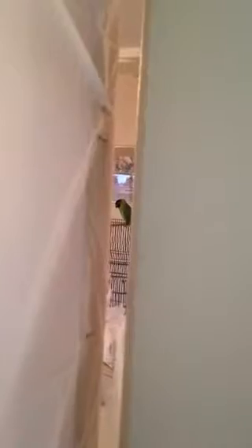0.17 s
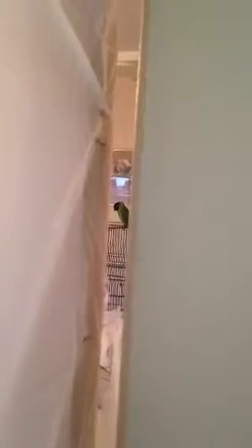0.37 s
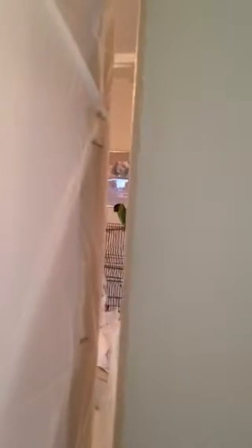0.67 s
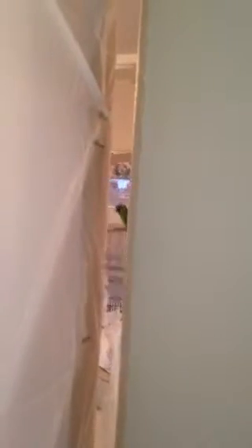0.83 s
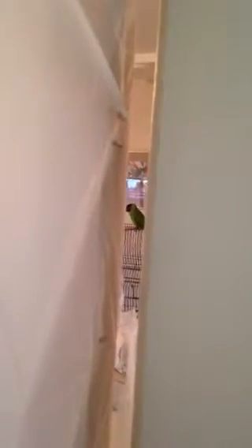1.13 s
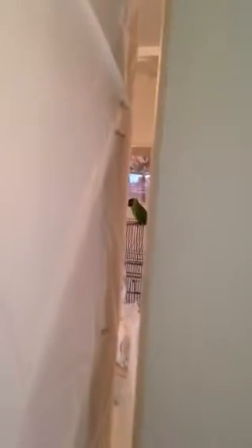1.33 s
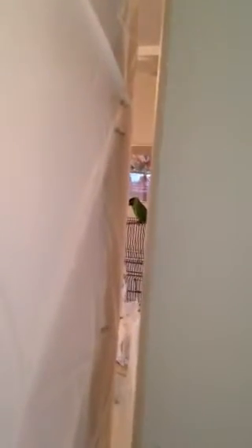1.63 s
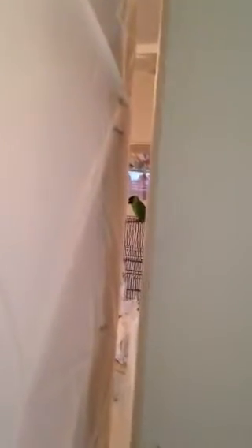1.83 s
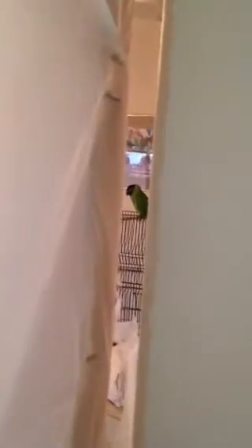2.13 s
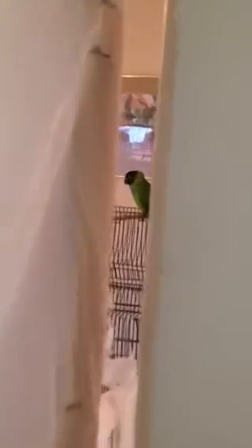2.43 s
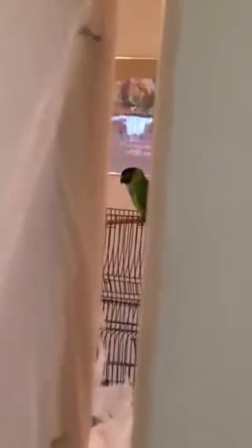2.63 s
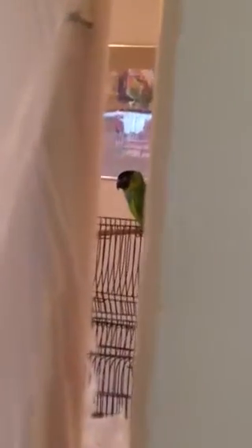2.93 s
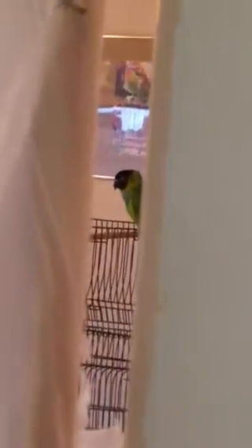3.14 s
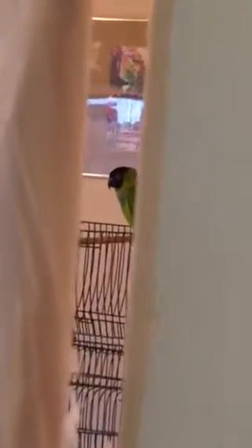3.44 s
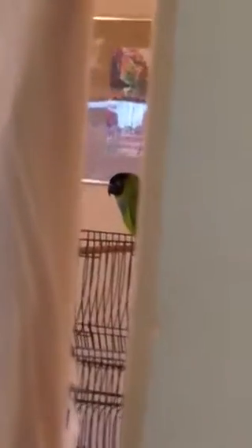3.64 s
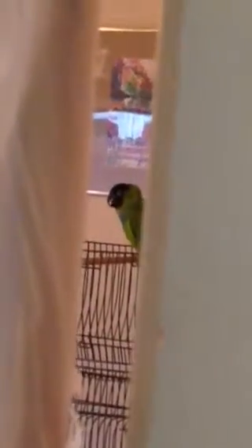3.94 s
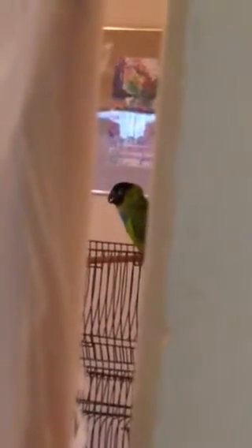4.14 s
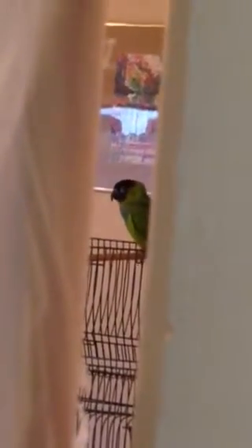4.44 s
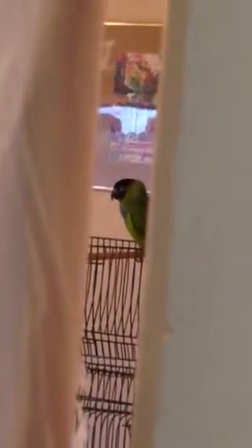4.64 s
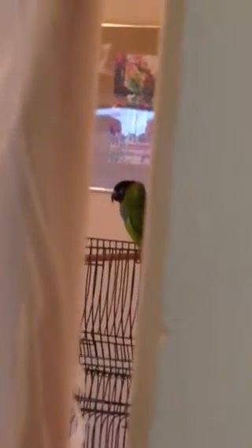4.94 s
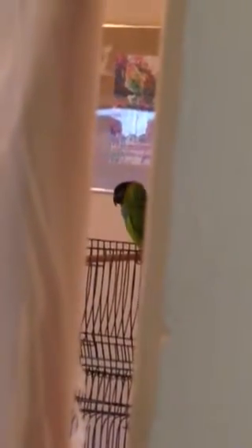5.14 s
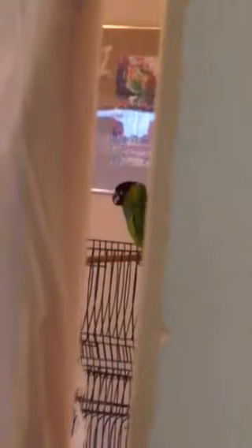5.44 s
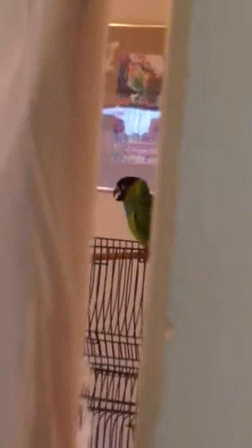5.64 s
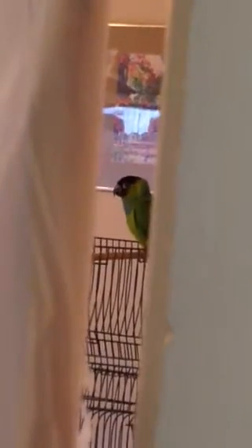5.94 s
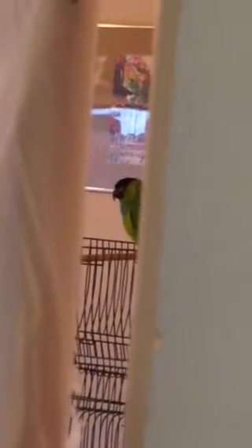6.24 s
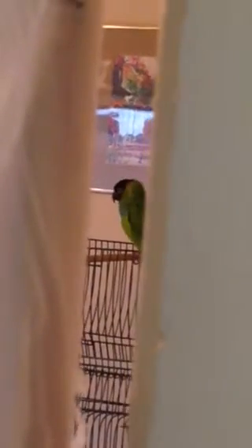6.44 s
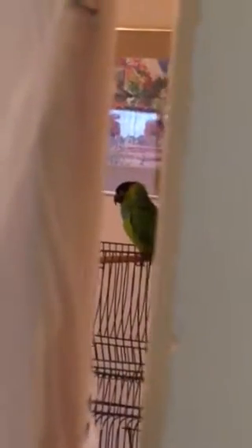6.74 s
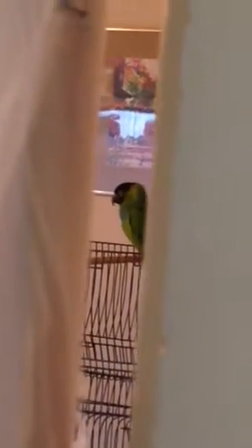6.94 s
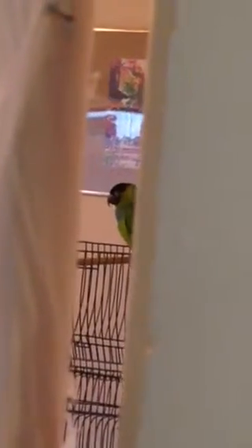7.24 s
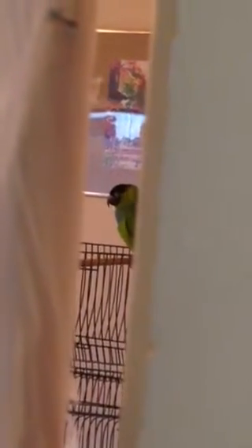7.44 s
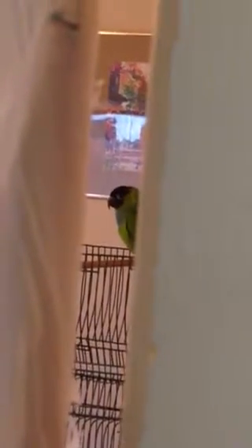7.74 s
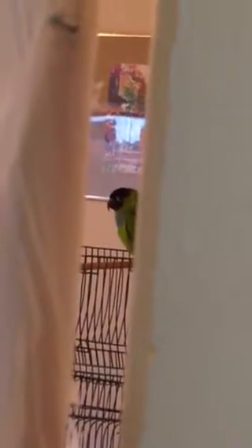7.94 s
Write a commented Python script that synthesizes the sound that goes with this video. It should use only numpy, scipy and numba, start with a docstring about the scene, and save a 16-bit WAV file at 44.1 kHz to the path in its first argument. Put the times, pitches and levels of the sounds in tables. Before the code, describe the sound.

Indoors over a steady low hum, a parrot's soft croaks and whistles build to four quick, harsh squawks and a last peep.

```python
"""A conure on its cage in a small, live room, over steady mains hum. A curtain rustles, then the bird's
syrinx membranes give two soft croaks and a whistle. A hand brushes and knocks the phone as the curtain
slips on. A croak leads into a harsh, fluttering rasp, another into a cracking whistle; four screeching
squawks follow, and the phone's gain control ducks the hum under them. A last peep rings off the walls,
and a few close ticks and a dull brush end the scene."""
import sys
import numpy as np
from scipy import signal
from scipy.fft import rfft, irfft, next_fast_len
from scipy.io import wavfile
from scipy.ndimage import minimum_filter1d
from numba import njit

SR = 44100
rng = np.random.default_rng(int(sys.argv[2]) if len(sys.argv) > 2 else 0)


def output_pcm(signal):
    """Save a mono or channel-first signal as 16-bit PCM at the path in sys.argv[1].

    Samples are clipped to [-1, 1] before scaling.
    """
    pcm = np.clip(np.atleast_2d(signal).T, -1, 1) * 32767
    wavfile.write(sys.argv[1], SR, np.round(pcm).astype(np.int16))


N = 356857
T = np.arange(N) / SR
CALL = SR // 4  # samples, more than the longest call
ONSET_DB = -19.5  # every call swells from this far down
COLLAPSE_S, FRAY_S = 0.0072, 0.012  # as the pressure fails, the pitch drops and the tone frays


def syrinx(hz, db, rough, lift_db, throat, halves_db, jitter, flutter_hz, patchy_db, air_db, tilt_db=0):
    """One call. The membranes beat at the pitch; driven hard they flutter and alternate strong and weak
    beats, which adds lines halfway between the harmonics. lift_db raises the second harmonic;
    a wider beak brightens the call by tilt_db an octave."""
    t = T[:len(hz)]
    flutter = jitter * rough * wobble(flutter_hz, CALL)[:len(t)]
    phase = 2 * np.pi * np.cumsum(hz * (1 + flutter)) / SR
    k = np.arange(1, 33)[:, None] / 2  # harmonics and the halves between them
    # the shape of the beat keeps changing, so each partial swells and fades on its own
    patches = wobble(80, len(k) * CALL).reshape(len(k), CALL)[:, :len(t)]
    colour_db = lookup(throat, k * hz) + tilt_db * np.log2(k)
    gain = undb(colour_db + halves_db * (k % 1 > 0) + lift_db * (k == 2) + patchy_db * patches)
    gain *= np.clip((SR / 2 - k * hz) / (SR / 10), 0, 1)  # the highest partials fade out smoothly
    gain /= np.sqrt(np.sum(gain ** 2, axis=0) / 2)
    tone = np.sum(gain * np.sin(k * phase + rng.uniform(0, 2 * np.pi, k.shape)), axis=0)
    # turbulent air escapes once a beat
    air = undb(air_db) * rough * noise(throat, CALL)[:len(t)] * (1 + .5 * np.cos(phase))
    fade = np.clip(np.minimum(t, t[-1] - t) / 0.0026, 0, 1)
    return (tone + air) * fade * undb(db)


def arch(t, crest_hz, crest_s, scoop_hz, sag_hz, sag_s, drop_hz):
    """Pitch of a call: it scoops up to a crest, sags to a lower note and drops at the very end."""
    scoop = np.maximum(1 - t / crest_s, 0) ** 2
    sag = 1 - np.exp(-(np.maximum(t - crest_s, 0) / sag_s) ** 2)
    drop = np.exp((t - t[-1]) / COLLAPSE_S)
    return crest_hz - scoop_hz * scoop - sag_hz * sag - drop_hz * drop


def effort(t, attack_s, fade_db):
    """Level of a call in dB: a quick swell, then an even fade (a rise if fade_db is negative)."""
    return ONSET_DB * np.exp(-t / attack_s) - fade_db * t / t[-1]


# The four squawks. Each row: start, sweep length and screech length in seconds, gain in dB,
# brightness of the screech in dB an octave.
SQUAWKS = [(5.099, 0.024, 0.1, -1, 0), (5.312, 0.023, 0.098, 1.5, 0), (5.53, .027, .102, 3, 0),
           (5.765, 0.026, 0.099, 4.5, -0.5)]


def squawks(overlap_s=.003):
    """Each harsh upward sweep breaks into a screech while it still sounds."""
    out = np.zeros(N)
    for start, sweep_s, screech_s, db, tilt_db in SQUAWKS:
        add(out, start, undb(db) * sweep(clock(sweep_s + overlap_s)))
        add(out, start + sweep_s, undb(db) * screech(clock(screech_s), tilt_db))
    return out


# Throat and beak colour of the screech. Each row: frequency in Hz, gain in dB.
SCREECH_THROAT = [(150, -31.5), (400, -10), (1000, -17), (1600, -23.5), (2050, -5), (2500, -15), (3050, 6),
                  (3550, 0), (4150, 2), (4550, -8.5), (5100, 2), (6100, 1), (6600, -12.5), (7100, 5.5),
                  (8100, -11), (8650, -14.5), (9300, 2), (10200, -10.5), (11000, -5), (12200, -25),
                  (15000, -22.5)]
# Flicks that lift the pitch and the second harmonic. Each entry: seconds into the screech.
FLICKS_S = [0.047, .067]


def screech(t, tilt_db):
    """The loud, brassy body of a squawk: a period-doubled arch with two upward flicks and a frayed end."""
    flick = sum(bump(t, at, width=.008) for at in FLICKS_S)
    hz = arch(t, crest_hz=2024.5, crest_s=0.027, scoop_hz=79.7, sag_hz=16, sag_s=.06, drop_hz=311)
    hz += 88.7 * flick
    hz *= 1 + .008 * wobble(70, CALL)[:len(t)]  # the pitch never holds quite still
    db = -2.5 + effort(t, attack_s=.001, fade_db=-0.96)
    rough = 0.16 + 0.44 * np.exp((t - t[-1]) / FRAY_S)
    halves_db = -10 + ONSET_DB * np.exp(-t / 0.0024)  # the doubling sets in after the first moments
    return syrinx(hz, db, rough, lift_db=4.5 + 4.5 * flick, throat=SCREECH_THROAT, halves_db=halves_db,
                  jitter=.042, flutter_hz=700, patchy_db=3, air_db=-7, tilt_db=tilt_db)


# Throat and beak colour of the sweep. Each row: frequency in Hz, gain in dB.
SWEEP_THROAT = [(350, -42.5), (650, -8), (1300, -6), (1900, -19), (2900, 8), (3900, 4), (5000, -4.5),
                (7000, -7.5), (10000, -13.5), (12000, -29), (15000, -32.5)]


def sweep(t, from_hz=610, to_hz=1533.6):
    """The rough rise that opens a squawk."""
    hz = np.linspace(from_hz, to_hz, len(t))
    db = -8.5 + effort(t, attack_s=.003, fade_db=2.5)
    return syrinx(hz, db, rough=0.35, lift_db=0, throat=SWEEP_THROAT, halves_db=-10.5,
                  jitter=0.096, flutter_hz=593, patchy_db=1.5, air_db=-19.0)


# Two whistles and the last peep. Each row: start, length and attack in seconds, level and fade in dB,
# crest in Hz, seconds to the crest, scoop and sag in Hz, sag time in seconds, closing drop in Hz,
# second-harmonic lift at the start and at the end in dB, brightness in dB an octave.
WHISTLES = [ (1.646, 0.1, 0.0012, -20.5, 4.5, 2513, 0.018, 30, 156, 0.04, 140, 29.5, -2.5, -1.5),
            (4.91, .118, 0.0042, -15.5, 12.5, 2675, 0.021, 142, 210, 0.024, 700, 1, 4.5, 3),
            (6.121, .08, 0.01, -17, 5, 2473, 0.035, 153, 12, 0.032, 23, 6.5, 6.5, 2)]
# Throat and beak colour of a whistle. Each row: frequency in Hz, gain in dB.
WHISTLE_THROAT = [(1200, -7.5), (2400, -1.5), (5000, -16), (7500, -17.5), (10000, -30), (12500, -30),
                  (15000, -27.5)]


def whistles(crack_at_s=4.973):
    """Clean arched notes that fray and dull as they end; the second one cracks halfway through."""
    out = np.zeros(N)
    for start, length, attack_s, db, fade_db, *pitch, first_db, last_db, tilt_db in WHISTLES:
        t = clock(length)
        ending = np.exp((t - t[-1]) / FRAY_S)
        rough = 0.056 + 0.092 * ending + 0.53 * bump(start + t, crack_at_s, width=.008)
        level_db = db + effort(t, attack_s, fade_db)
        lift_db = np.linspace(first_db, last_db, len(t))
        note = syrinx(arch(t, *pitch), level_db, rough, lift_db, WHISTLE_THROAT, halves_db=-56.5,
                      jitter=.04, flutter_hz=700, patchy_db=3.5, air_db=-39.5,
                      tilt_db=tilt_db - 5 * ending)
        add(out, start, note)
    return out


# Throat and beak colour of the rasp. Each row: frequency in Hz, gain in dB.
RASP_THROAT = [(500, -37.5), (1100, -25.5), (1600, -27.5), (2250, -1.5), (2800, -9.5), (3300, -3),
               (3750, -5.5), (4200, 2), (4700, 0.5), (5100, -13), (5600, -5), (6600, -10), (8000, -12.5),
               (10000, -28), (15000, -39)]


def rasp(start_s=4.026, length_s=.168):
    """One long, rough arch: the membranes flutter chaotically and smear every harmonic into a band."""
    out, t = np.zeros(N), clock(length_s)
    hz = arch(t, crest_hz=2253, crest_s=.115, scoop_hz=223.3, sag_hz=88.7, sag_s=0.033, drop_hz=291.4)
    db = -15 + effort(t, attack_s=0.012, fade_db=-1.0)
    call = syrinx(hz, db, rough=0.74, lift_db=2, throat=RASP_THROAT, halves_db=-2.0,
                  jitter=.055, flutter_hz=220, patchy_db=2.5, air_db=-36.5)
    add(out, start_s, call)
    return out


# The croaks. Each row: start and length in seconds, first and last pitch in Hz, level in dB,
# roughness from 0 to 1, second-harmonic lift in dB.
CROAKS = [(1.422, 0.018, 574, 923, -33, 0.84, 4.5), (1.611, 0.029, 585, 1157, -35, 0.83, 4),
          (4.022, 0.024, 1054, 1580, -41, 0.6, 10.5), (4.874, 0.032, 517, 1145, -28.5, 0.15, 0)]
# Throat and beak colour of a croak. Each row: frequency in Hz, gain in dB.
CROAK_THROAT = [(330, -26), (600, -2.5), (950, 11), (1450, 0.5), (2000, -0.5), (3000, -11.5), (4000, -12),
                (5500, -14.5), (7000, -28.5), (9000, -38.5), (15000, -50.5)]


def croaks():
    """Soft, low glides that swell as they rise."""
    out = np.zeros(N)
    for start, length, first_hz, last_hz, db, rough, lift_db in CROAKS:
        t = clock(length)
        hz = np.linspace(first_hz, last_hz, len(t))
        level_db = db + effort(t, attack_s=0.0021, fade_db=0)
        croak = syrinx(hz, level_db, rough, lift_db, CROAK_THROAT, halves_db=-24,
                       jitter=0.073, flutter_hz=598.7, patchy_db=2.0, air_db=-18.5)
        add(out, start, croak)
    return out


# Small knocks and ticks of handling. Each row: start in seconds, level in dB, resonance in Hz.
KNOCKS = [(1.064, -39, 338), (1.864, -30.5, 557), (2.082, -44.5, 4400), (2.303, -54, 7790),
          (7.146, -44, 2300), (7.319, -56, 1626), (7.414, -46.5, 2784), (7.435, -36, 1580)]


def knocks():
    """Dead little blows, each with one broad resonance; the higher the knock, the sooner it dies."""
    out, t = np.zeros(N), T[:SR // 5]
    for start, db, hz in KNOCKS:
        resonance = [(hz / 12, -18), (hz / 3, -2), (hz, 0), (hz * 3, -16), (hz * 9, -42), (hz * 20, -60)]
        contact = 1 - np.exp(-(t * hz) ** 2)  # a duller blow pushes more slowly
        decay_s = 0.00607 * (1000 / hz) ** 0.42
        add(out, start, undb(db) * noise(resonance, len(t)) * contact * np.exp(-t / decay_s))
    return out


# Slides of the curtain. Each row: peak time and half-width in seconds, level in dB.
RUSTLES = [(.198, 0.043, -48.5), (.24, 0.11, -56.5), (.03, 0.096, -66), (.58, .12, -66.5),
           (1.01, .064, -68.5), (2.05, 0.064, -64.5)]
# The bright hiss of cloth. Each row: frequency in Hz, gain in dB.
CLOTH_COLOUR = [(470, -39), (800, -1), (1330, -4.5), (2410, 7.5), (2940, 3), (3330, 8.5), (7930, 9),
                (15500, -4)]


def curtain(slip_from_s=2.16, slip_to_s=3.12):
    """Fibres catch and slip in soft strokes, then keep slipping in random swishes that die away."""
    along = (T - slip_from_s) / (slip_to_s - slip_from_s)
    slip_db = -72 - 8.5 * along + 4.5 * wobble(16, N)
    slipping = ((along > 0) & (along < 1)) * undb(slip_db)
    return (swishes(RUSTLES) + slipping) * noise(CLOTH_COLOUR, N) * undb(1.7 * wobble(80, N))


# Brushes of a hand, and the dull low thud that follows the knock at 1.864 s. Each row: peak time and half-width
# in seconds, level in dB.
BRUSHES = [(1.89, .028, -52.5), (2.62, .2, -61.5), (3.65, .06, -61), (7.8, .09, -61)]
# The muffled rub of skin. Each row: frequency in Hz, gain in dB.
SKIN_COLOUR = [(60, -5), (250, 0.5), (700, -5.5), (1500, -12), (4000, -23.5), (15000, -38)]


def hand():
    """Skin rubs dully on the phone; one soft low thud follows a knock."""
    return swishes(BRUSHES) * noise(SKIN_COLOUR, N)


# How long the room rings. Each row: frequency in Hz, seconds to fall by 60 dB.
ROOM_T60 = [(200, .3), (900, 0.52), (2200, 0.49), (4500, 0.46), (8000, 0.38), (15000, 0.11)]


def room(x, wet_db, early_db, early_s, gap_s):
    """What the walls return: a quick scatter, and a tail that lasts longest in the mids."""
    t = T[:SR]
    f = np.fft.rfftfreq(SR, 1 / SR)
    white = rfft(rng.standard_normal(SR))
    centres, t60s = np.transpose(ROOM_T60)
    tail = 0
    for share, t60 in zip(np.eye(len(centres)), t60s):
        band = irfft(white * lookup(np.c_[centres, share], f), SR)
        tail = tail + band * np.exp(-np.log(1000) * t / t60)
    # furnishings soak up the top of the scatter
    early = noise([(4000, -0.5), (8000, -4.5), (15000, -6.5)], SR) * np.exp(-t / early_s)
    response = (undb(wet_db) * tail + undb(early_db) * early) * np.clip(t / gap_s, 0, 1) / np.sqrt(SR)
    return signal.fftconvolve(x, response)[:N]


# Dark room tone. Each row: frequency in Hz, gain in dB.
ROOM_TONE = [(25, 5.5), (60, 6.5), (120, 2), (250, -3), (500, -8), (1000, -12), (2000, -19.5),
             (4000, -24.5), (8000, -28.5), (15000, -37.5)]


def background(hum_hz=120.2, hum_db=-49.5, air_db=-59.5):
    """An appliance hums at twice the mains rate over the still air of the house."""
    hum = undb(hum_db + 0.11 * wobble(2, N)) * np.sqrt(2) * np.sin(2 * np.pi * hum_hz * T)
    return hum + undb(air_db) * noise(ROOM_TONE, N)


def undb(db):
    """Decibels to gain."""
    return 10 ** (np.asarray(db) / 20)


def unit(x):
    """Scale to rms 1."""
    return x / np.sqrt(np.mean(x ** 2))


def lookup(points, hz):
    """Read (Hz, value) points on a log-frequency axis."""
    f, value = np.transpose(points)
    return np.interp(np.log(np.maximum(hz, 1)), np.log(f), value)


def noise(points, size):
    """Noise of rms 1 with the colour of (Hz, dB) points."""
    n = next_fast_len(size)
    colour = undb(lookup(points, np.fft.rfftfreq(n, 1 / SR)))
    return unit(irfft(rfft(rng.standard_normal(n)) * colour, n)[:size])


def wobble(hz, size):
    """Random flutter of spread 1, rolled off above hz."""
    return unit(signal.sosfilt(signal.butter(4, hz, fs=SR, output="sos"), rng.standard_normal(size)))


def bump(t, at, width):
    """A smooth rise and fall of height 1."""
    return np.exp(-((t - at) / width) ** 2)


def swishes(rows):
    """Envelope of a run of soft strokes."""
    return sum(undb(db) * bump(T, at, width) for at, width, db in rows)


def clock(length):
    """Sample times of a sound, from its start."""
    return T[:int(length * SR)]


def add(track, start, sound):
    """Mix a sound in at a time."""
    i = int(start * SR)
    track[i:i + len(sound)] += sound[:N - i]


def scene(averted_db=-6, close_send_db=-4):
    """The bird across the room, the curtain at hand, the hum everywhere. The rasp is aimed aside and
    comes mostly off the walls; the handling is close to the phone and stirs the room less."""
    sources = croaks() + whistles() + squawks() + curtain()
    aside = rasp()
    close = hand() + knocks()
    send = sources + aside + undb(close_send_db) * close
    walls = room(send, wet_db=6.0, early_db=8.5, early_s=0.037, gap_s=0.0046)
    return (sources + undb(averted_db) * aside + close + walls + background())[None]


@njit
def follow(x, attack, release):
    """Peak envelope: quick to rise, slow to fall."""
    out, level = np.empty(len(x)), 0.
    for i in range(len(x)):
        level += (x[i] - level) * (attack if x[i] > level else release)
        out[i] = level
    return out


def record(dry, knee_db=0.5, attack_s=0.0017, hold_s=0.14, release_s=0.21, ceiling=0.6, top_hz=15400):
    """Gain control ducks the screeches, waits, then recovers; peaks are rounded, rumble and top cut."""
    half = int(hold_s * SR / 2)
    peak = -minimum_filter1d(-np.abs(dry[0]), 2 * half + 1, origin=half)
    envelope = follow(peak, 1 / (1 + attack_s * SR), 1 / (1 + release_s * SR))
    held = dry / (1 + (envelope / undb(knee_db)) ** 4) ** (1 / 4)
    rounded = ceiling * np.tanh(held / ceiling)
    thinned = signal.sosfilt(signal.butter(4, 62, "high", fs=SR, output="sos"), rounded)
    return signal.sosfilt(signal.ellip(10, .2, 80, top_hz, fs=SR, output="sos"), thinned)


dry = scene()
out = record(dry)
output_pcm(out)
```